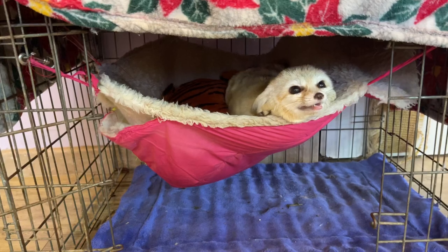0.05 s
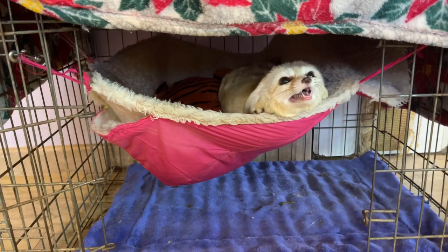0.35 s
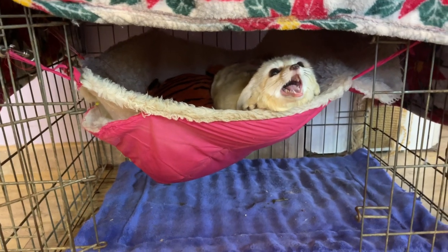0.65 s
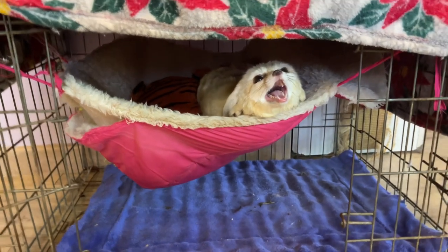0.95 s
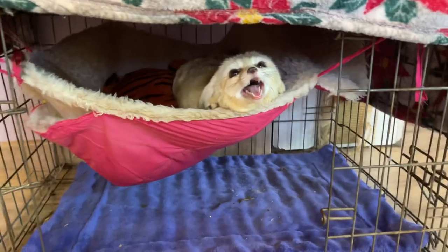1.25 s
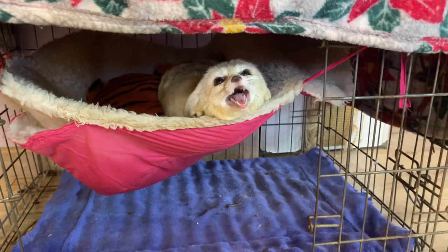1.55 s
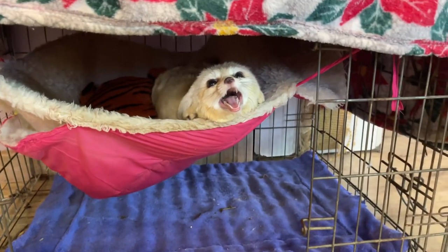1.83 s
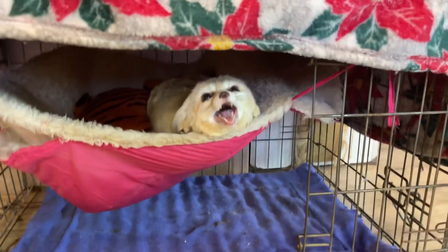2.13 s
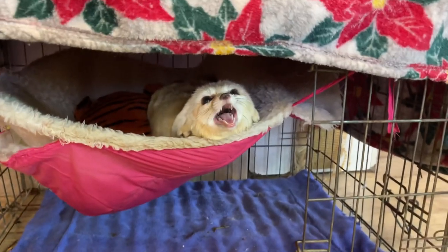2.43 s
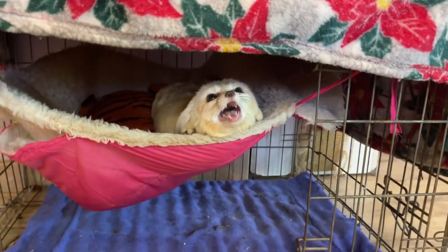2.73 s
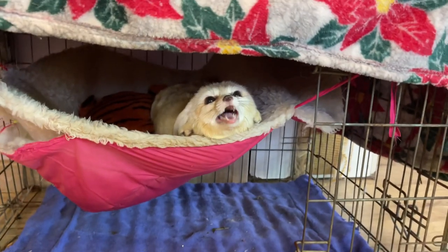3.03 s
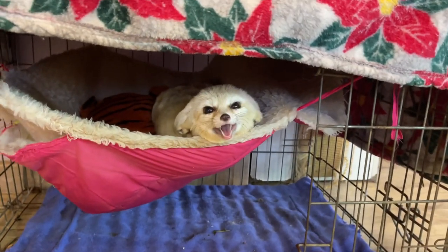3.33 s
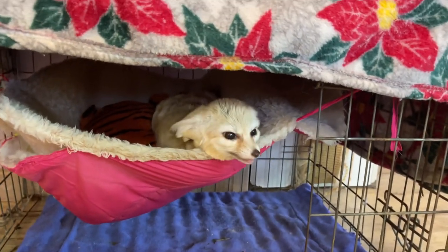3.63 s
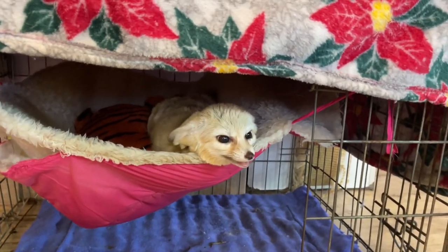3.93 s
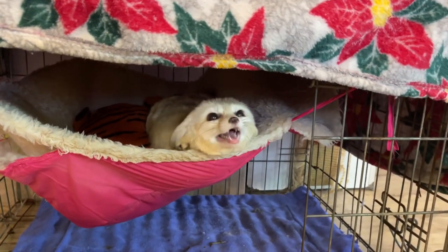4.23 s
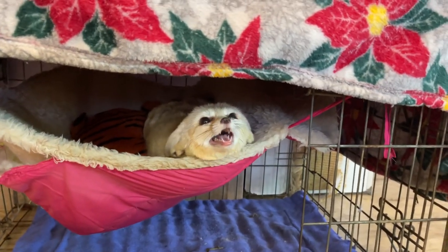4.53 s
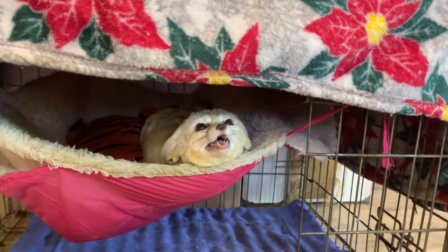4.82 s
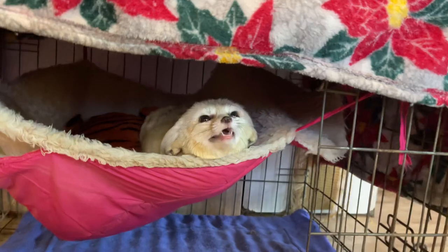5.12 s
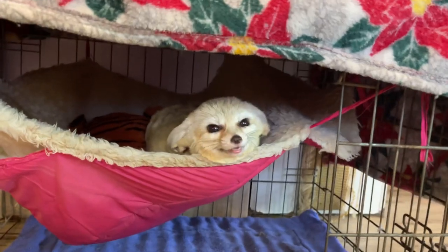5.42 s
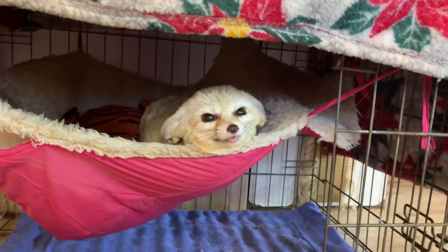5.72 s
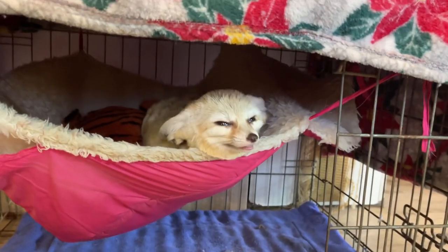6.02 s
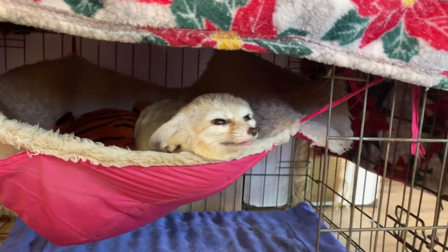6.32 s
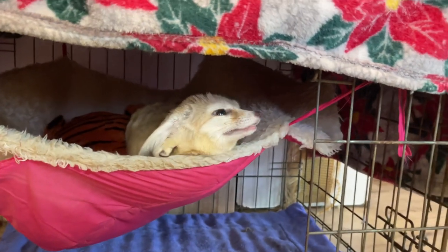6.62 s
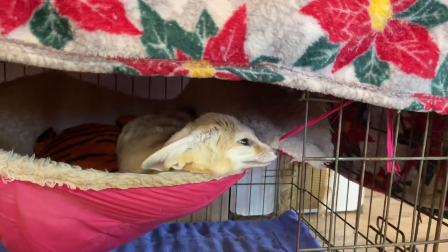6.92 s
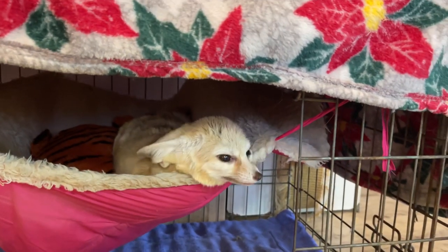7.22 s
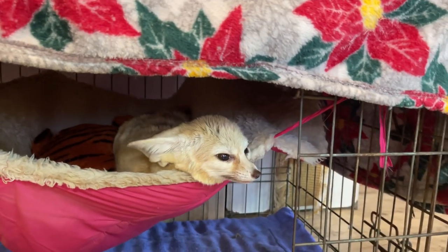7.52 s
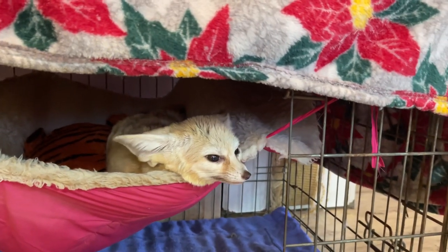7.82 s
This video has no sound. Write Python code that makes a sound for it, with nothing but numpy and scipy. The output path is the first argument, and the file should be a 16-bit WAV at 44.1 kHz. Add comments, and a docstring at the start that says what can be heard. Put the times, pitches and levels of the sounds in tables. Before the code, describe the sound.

Close, shrill, harsh yaps from a small fox repeat quickly, then slow and fade into whines, with faint dragging swishes further off.

```python
"""A fennec fox scolds from a hammock in a cloth-covered wire cage, in a small room with a mains hum.
Each call opens as a thin rising squeal of tight vocal folds, then breaks into a harsh yap, in which a
low and a high voice mix into sum and difference tones. The calls slow and end in a few hoarse whines.
Further off, something is dragged in swishes of stick-slip friction. Fleece rustles, faint bumps and
creaks are heard, and the cage and the room add their reflections."""
import sys
import numpy as np
from scipy import signal
from scipy.fft import rfft, irfft, next_fast_len
from scipy.io import wavfile
from scipy.ndimage import uniform_filter1d, map_coordinates

SR = 44100
rng = np.random.default_rng(int(sys.argv[2]) if len(sys.argv) > 2 else 0)


def put_to_file(sound):
    """Save the sound as 16-bit audio at rate SR, in the file named by the first command-line argument."""
    columns = np.atleast_2d(sound).T  # one column per channel
    safe = np.clip(columns, -1, 1)
    whole_steps = np.round(safe * 32767)
    wavfile.write(sys.argv[1], SR, whole_steps.astype(np.int16))


N = 355357
TIME = np.arange(N) / SR

# Spectra of noises and filters. Each row: frequency in Hz, relative level in dB.
ROOM_AIR_SPECTRUM = [(20, -38.5), (36, -29.5), (55, -8), (120, -13), (250, -13.5), (450, -24), (1200, -23),
                     (3500, -41), (6500, -33), (9500, -40), (12000, -73.5)]
REVERB_SPECTRUM = [(300, 0), (1000, 10), (2500, 10.5), (5000, -2), (9000, -5.5), (11000, -26)]
BUMP_SPECTRUM = [(120, -50.5), (230, -5), (340, -7.5), (550, -5.5), (800, -11.5), (2000, -55)]
FLEECE_SPECTRUM = [(2000, -6.5), (4000, -8.5), (7500, -0.5), (9500, -6.5), (12000, -17)]
DRAG_LOW_SPECTRUM = [(120, -69), (200, -62.5), (273, -8), (398, -12.5), (674, 0.5), (1090, -4), (1240, 4.5),
                     (1380, 3.5), (1600, -20.5), (1900, -9), (2470, -60.5), (4180, -120)]
DRAG_HISS_SPECTRUM = [(1060, -48), (1800, 3), (2170, -1.5), (2240, -3), (2670, 3.5), (3710, -0.5),
                      (5250, 6), (5690, -5), (9220, -14.5), (10100, -52.5), (12300, -49.5), (16000, -42),
                      (22000, -120)]
WHINE_AIR_SPECTRUM = [(350, -63.5), (600, -34), (919, -1), (1620, -2), (1830, -20.5), (2290, -11),
                      (6830, 3), (7450, -10), (9460, -12), (10100, -24), (12000, -21), (15600, -57),
                      (22000, -120)]
THROAT_AIR_SPECTRUM = [(600, -48.5), (1100, -19), (1800, -7), (2600, -18), (3400, 2.5), (4200, 2),
                       (5200, 6.5), (6400, 2.5), (8000, -9.5), (9400, -4.5), (12000, -26)]
MOUTH_AND_CAGE_SPECTRUM = [(480, -7.5), (740, -10), (1000, 0), (1500, 3.5), (2200, 5), (2900, 2.5),
                           (3650, 4), (4200, 4), (4800, 3.5), (5400, 5), (6300, 6), (7200, 4.5), (9200, 8),
                           (10000, 1), (11300, 0), (12500, -23)]

# Mains hum. Each row: harmonic number, relative level in dB.
HUM_HARMONICS = [(1, -75), (2, -61), (3, -68.5), (4, -75.5)]
# Reverberation time of the room. Each row: frequency in Hz, seconds to fall by 60 dB.
REVERB_TIMES = [(300, 0.45), (1000, 0.45), (3000, 0.41), (6000, 0.64), (12000, 0.56)]
# Soft bumps. Each row: time of the peak in seconds, length of each flank in seconds, level in dB.
SOFT_BUMPS = [(0.321, 0.18, -64.5), (3.12, 0.1, -59.5), (3.403, .21, -57.5), (6.676, 0.046, -66),
              (7.527, 0.066, -61.5), (7.993, .09, -60)]
# Creaks. Each row: start in seconds, length in seconds, first pitch in Hz, last pitch in Hz, level in dB.
FALLING_CREAKS = [(7.746, 0.043, 720, 506, -61), (7.837, 0.043, 560, 434, -59),
                  (7.84, 0.082, 960, 604, -73)]
# Resonances of the dragged thing. Each row: frequency in Hz, bandwidth in Hz, relative level in dB.
DRAG_RESONANCES = [(818, 16, -2.5), (1360, 75, -2), (2334, 12, 1.5), (2670, 300, -4.5), (3110, 390, -8),
                   (3460, 230, -12.5), (3970, 27, -4.5), (4280, 54, -1), (4910, 53, -10.5)]
# Swishes of the dragged thing. Each row: end of the attack in seconds, hold in seconds,
# relative levels of the low part and of the hiss in dB, hollow resonance in Hz.
DRAG_SWISHES = [(.94, 0.21, -39.5, -38.5, 1350), (3.14, 0.14, -53, -52, 1000),
                (3.37, 0.071, -46.5, -38.5, 1145), (6.64, 0.24, -41.5, -39, 1072),
                (6.82, 0.078, -37, -22.5, 1400), (7.0, 0.12, -48.5, -38.5, 1392),
                (7.99, .02, -56, -60, 1000)]
# Phase between the microphone's ports. Each row: frequency in Hz, lead of the left in radians.
LEFT_PHASE_LEAD = [(0, -1.5), (1460, 0.69), (3360, 1.5), (3880, 1.09), (5430, 4), (5860, 5.5), (6630, 8.5),
                   (7060, 6), (7840, 6.5), (8870, 8.5), (9730, 3), (10900, 2), (11600, 2.4), (12100, 13.5)]
# The microphone turns, then settles. Each row: time in seconds, extra lead of the right port in ms,
# level of right over left in dB.
MICROPHONE_AIM = [(.2, 0.048, 1.5), (.75, 0.048, 2.5), (1.25, 0.026, 3.4), (1.702, 0.0019, 1.5),
                  (3.6, 0.0021, 1), (6.5, 0, 0.5)]
# Whines. Each row: start in seconds, length in seconds, pitch in Hz, relative tone and air levels in dB.
HOARSE_WHINES = [(6.802, 0.078, 1406, -44, -26), (7.092, 0.094, 1905, -45.5, -39),
                 (7.563, 0.061, 1715, -55.5, -43.5)]
# Harmonics of the whine and the squeal. Each entry: relative level in dB, from the fundamental up.
WHINE_HARMONICS_DB = [8, -31, -20, 2.5]
SQUEAL_HARMONICS_DB = [-21.5, -4, -1.5, -7, -17, -20, -33]
# The squeal jumps from a weak lower register to a strong upper one.
# Each row: nominal time from the break in seconds, nominal pitch in Hz, relative level in dB.
SQUEAL_CONTOUR = [(-.04, 1330, -20), (-.03, 1400, -14), (-.022, 1440, -12), (-.019, 1560, -8),
                  (-.01, 1610, -3), (0, 1660, 1)]
# Tones of the yap. Each row: multiple of the high voice, multiple of the low voice, relative level in dB.
COMBINATION_TONES = [(0, 2, -18), (1, -1, -21.5), (1, 0, -9.5), (1, 1, -5.5), (1, 2, -0.5), (2, -1, -13),
                     (2, 0, -6), (1, 3, -7.5), (2, 1, -3.5), (2, 2, -9), (3, 0, -13.5), (3, 1, -13.5),
                     (3, 2, -16), (4, 1, -12)]
# Brightness as the mouth gapes and narrows. Each row: time in seconds, spectral tilt in dB.
GAPE_TILT = [(.2, -1), (.75, 0.75), (1.8, 0.52), (3.9, -0.74), (5.2, -0.44), (6.5, -1.5)]
# Calls. Each row: time of the break from squeal to yap in seconds, yap length in seconds, relative level
# in dB, squeal level against the yap in dB, low voice in Hz, high voice in Hz, roughness from 0 to 1.
CALLS = [ (.203, 0.045, -22, -6, 1085, 2664, 0.37), (0.458, 0.047, -18.5, -11, 1092, 2628, 0.72),
         (.726, 0.038, -19, -7, 1128, 2567, .75), (0.974, 0.038, -17.5, -11.5, 1173, 2667, 0.9),
         (1.239, .037, -19, -8.5, 1115, 2670, 0.69), (1.517, 0.04, -20, -1, 1120, 2554, 0.58),
         (1.783, 0.039, -20, -2, 1105, 2578, 0.63), (2.071, 0.041, -21, -5, 1019, 2568, 0.42),
         (2.345, 0.04, -22, 0, 1044, 2575, 0.57), (2.63, 0.045, -21.5, -9, 979.4, 2477, 0.47),
         (3.017, .051, -23.5, -6, 975.5, 2447, 0.47), (3.322, 0.041, -26.5, -8, 950, 2880, 1),
         (3.611, 0.05, -35, -3.5, 888, 2440, 0.84), (3.881, 0.043, -25.5, -6, 1025, 2620, 0.7),
         (4.185, 0.046, -20, -9.5, 990, 2562, 0.7), (4.463, 0.037, -21.5, -3, 972, 2454, 0.54),
         (4.783, 0.034, -24, -1, 841, 2710, 0.8), (5.142, .026, -23, -3.5, 850.5, 2848, 0.7),
         (5.47, 0.033, -25.5, -4, 748.6, 2860, 0.4), (5.879, 0.047, -25, -4, 731, 2938, 0.35),
         (6.198, 0.044, -28, -2.5, 778, 3043, 0.8), (6.491, 0.06, -24, -5.5, 977, 2644, .75)]

USUAL_LOW_HZ = 976.7   # the low voice at ordinary throat tension


def from_db(db):
    """Amplitude grows tenfold with every 20 dB."""
    return 10 ** (np.asarray(db) / 20)


def unit_rms(x):
    """Division by the root mean square gives a signal unit power."""
    return x / np.sqrt(np.mean(x ** 2) + 1e-20)


def at_hz(points, hz):
    """A table is interpolated along a logarithmic frequency axis."""
    frequencies, values = np.transpose(points)
    return np.interp(np.log(np.maximum(hz, 1)), np.log(frequencies), values)


def coloured(x, spectrum):
    """A linear filter multiplies each frequency by its own gain."""
    size = next_fast_len(x.shape[-1] + 2048)
    gain = from_db(at_hz(spectrum, np.fft.rfftfreq(size, 1 / SR)))
    return irfft(rfft(x, size) * gain, size)[..., :x.shape[-1]]


def noise(spectrum, shape):
    """White noise takes on the spectrum of its filter."""
    return unit_rms(coloured(rng.standard_normal(shape), spectrum))


def wobble(rate_hz, size):
    """Low-passed noise gives a smooth random fluctuation of unit power."""
    lowpass = signal.butter(2, rate_hz, fs=SR, output="sos")
    return unit_rms(signal.sosfilt(lowpass, rng.standard_normal(2 * size))[size:])


def phase_of(hz):
    """Phase is the time integral of frequency."""
    return 2 * np.pi * np.cumsum(hz) / SR


def swell(times, db):
    """An envelope runs straight in dB between its points and is silent outside them."""
    return from_db(np.interp(TIME, times, db, left=-np.inf, right=-np.inf))


def decay(start, db, db_per_s, open_s=1.0):
    """Exponential decay follows a sudden onset; a gate stays open for open_s, then closes as slowly."""
    gate = np.interp(TIME, [start - .002, start, start + open_s, start + 2 * open_s], [0, 1, 1, 0])
    return gate * from_db(db - db_per_s * np.maximum(TIME - start, 0))


def background(mains_hz=50, rise_db_per_s=0.68):
    """Harmonics of the mains, stronger on the left, swell slowly along with the room's broadband air."""
    hum = 0
    for k, db in HUM_HARMONICS:
        phase = 2 * np.pi * k * mains_hz * TIME + rng.uniform(0, 2 * np.pi)
        hum += np.sqrt(2) * from_db(db) * np.sin(phase)
    shared_air = from_db(-72) * noise(ROOM_AIR_SPECTRUM, N)
    diffuse_air = from_db(-67.5) * noise(ROOM_AIR_SPECTRUM, (2, N))
    return from_db(-2.5 + rise_db_per_s * TIME) * (hum * from_db([[2.2], [-3]]) + shared_air + diffuse_air)


def reflections(x, room_db, cage_db=-10, cage_t60_s=0.062, gap_s=0.015):
    """Convolution adds the cage's early reflections and a room tail with a decay rate for each band."""
    t = TIME[:SR * 3 // 4]
    tail, edges = 0, np.geomspace(150, 15000, 9)
    for low, high in zip(edges, edges[1:]):
        bandpass = signal.butter(2, [low, high], "band", fs=SR, output="sos")
        band = signal.sosfilt(bandpass, rng.standard_normal((2, len(t))))
        tail += band * from_db(-60 * t / at_hz(REVERB_TIMES, np.sqrt(low * high)))
    tail = coloured(tail, REVERB_SPECTRUM) * (t > gap_s)
    cage = rng.standard_normal((2, len(t))) * from_db(-60 * t / cage_t60_s) * (t > .001)
    response = (from_db(cage_db) * unit_rms(cage) + from_db(room_db) * unit_rms(tail)) / np.sqrt(len(t))
    return signal.fftconvolve(np.atleast_2d(x), response, axes=1)[:, :N]


def room_ring(hz=1050):
    """The reverberation of an earlier call dies away exponentially."""
    tone = from_db(-10) * wobble(11, N) * np.sin(2 * np.pi * hz * TIME)
    air = coloured(noise(THROAT_AIR_SPECTRUM, (2, N)), REVERB_SPECTRUM)
    return decay(start=.036, db=-43, db_per_s=112.5) * (air + tone)


def bumps():
    """Brief swells of low-frequency noise are heard as dull bumps."""
    envelope = sum(swell([peak - flank, peak, peak + flank], [db - 10.5, db, db - 13])
                   for peak, flank, db in SOFT_BUMPS)
    return envelope * noise(BUMP_SPECTRUM, N)


def creaks(jitter=0.038):
    """Falling tones with random frequency modulation are heard as tiny creaks."""
    out = np.zeros(N)
    for start, length, first_hz, last_hz, db in FALLING_CREAKS:
        pitch = np.interp(TIME, [start, start + length], [first_hz, last_hz])
        phase = phase_of(pitch * (1 + jitter * wobble(221, N)))
        out += swell([start, start + length / 3, start + length], [db - 30, db, db - 6]) * np.sin(phase)
    return out


def fleece_rustle(grain_db=3):
    """Friction gives a grainy hiss as fleece shifts under the fox."""
    envelope = decay(start=7.348, db=-51, db_per_s=48, open_s=0.16)
    return envelope * noise(FLEECE_SPECTRUM, (2, N)) * from_db(grain_db * wobble(230, N))


def stick_slip(rate_hz=55, depth_db=3):
    """Alternate sticking and slipping modulates the amplitude of a resonance."""
    return from_db(depth_db * wobble(rate_hz, N))


def resonances(modes):
    """Under broadband excitation each mode rings in a band about its natural frequency."""
    white = rng.standard_normal((2, N))
    return unit_rms(sum(from_db(db) * signal.lfilter(*signal.iirpeak(hz, hz / width, fs=SR), white)
                        for hz, width, db in modes))


def swish(start, attack, hold, db, release_db_per_s):
    """The envelope of one swish grows exponentially, holds and decays exponentially."""
    attack_db = -10 * np.clip((start - TIME) / attack, 0, 10)
    release_db = -release_db_per_s * np.clip(TIME - start - hold, 0, 1)
    return from_db(db + attack_db + release_db)


def dragging(attack_s=0.0625, rise_hz=166.6, hollow_spread_hz=90):
    """Sliding friction excites a dragged thing's resonances, uncorrelated at the two ears."""
    low_gain, hiss_gain, glide = 0, 0, []
    for start, hold, low_db, hiss_db, hz in DRAG_SWISHES:
        low_gain = np.maximum(low_gain, swish(start, attack_s, hold, low_db, release_db_per_s=136.5))
        hiss_gain = np.maximum(hiss_gain, swish(start, attack_s, hold, hiss_db, release_db_per_s=143.5))
        glide += [(start - attack_s, hz - rise_hz), (start + .07, hz)]   # climbs as the swish gains speed
    carrier = np.exp(1j * phase_of(np.interp(TIME, *np.transpose(glide))))
    sidebands = np.array([wobble(hollow_spread_hz, N) + 1j * wobble(hollow_spread_hz, N) for _ in range(2)])
    hollow = np.real(carrier * sidebands)
    low = noise(DRAG_LOW_SPECTRUM, (2, N)) + from_db(-3) * hollow * stick_slip()
    hiss = from_db(-2.5) * noise(DRAG_HISS_SPECTRUM, (2, N))
    hiss += from_db(-0.5) * resonances(DRAG_RESONANCES) * stick_slip()
    grain = from_db(-7.5 - wobble(90, N))
    return grain * (low_gain * low + hiss_gain * hiss)


def at_ports(x):
    """A wave meets the two ports with differences of phase and level that shift as the microphone turns."""
    size = next_fast_len(N + 2048)
    lead = np.interp(np.fft.rfftfreq(size, 1 / SR), *np.transpose(LEFT_PHASE_LEAD))
    right = irfft(rfft(x, size) * np.exp(-1j * lead), size)[:N]
    times, early_ms, pan_db = np.transpose(MICROPHONE_AIM)
    early_samples = np.interp(TIME, times, early_ms) * SR / 1000
    right = map_coordinates(right, [np.arange(N) + early_samples], order=3)
    return np.array([x, right]) * from_db(np.interp(TIME, times, pan_db) / 2 * np.array([[-1], [1]]))


def whines(jitter=0.055, edge_s=0.038):
    """Pitch jitter and breath noise make weak harmonic tones hoarse."""
    out, air = np.zeros(N), noise(WHINE_AIR_SPECTRUM, N)
    for start, length, hz, tone_db, air_db in HOARSE_WHINES:
        end = start + length
        gate = np.interp(TIME, [start - edge_s, start + edge_s, end - edge_s, end], [0, 1, 1, 0])
        phase = phase_of(hz * (1 + jitter * wobble(500, N)))
        tone = np.sqrt(2) * sum(from_db(db) * np.sin(k * phase) for k, db in enumerate(WHINE_HARMONICS_DB, 1))
        out += gate * (from_db(tone_db) * tone + from_db(air_db) * air)
    return out


def squeal(t, tension, usual_length_s=0.028, release_db_per_s=1800, opening_s=0.016):
    """Tight vocal folds vibrate in a thin, rising harmonic tone that dies at the break (t = 0)."""
    size = len(t)
    length = usual_length_s * tension ** -1.7   # a slack throat squeals longer and a little flatter
    tuning = tension ** .04 * (1 + .015 * rng.standard_normal())
    times, hz, db = np.transpose(SQUEAL_CONTOUR)
    times = times * np.exp(0.11 * rng.standard_normal())   # the register jump comes early or late
    jitter = 1 + 0.0073 * wobble(450, size) + .012 * wobble(50, size)
    phase = phase_of(tuning * np.interp(t, times, hz) * jitter)
    tone = sum(from_db(level + 3 * wobble(40, size)) * np.sin(k * phase)
               for k, level in enumerate(SQUEAL_HARMONICS_DB, 1))
    opening = np.clip((t + length) / opening_s, 0, 1)
    catch_db = 1.5 * wobble(160, size)
    gain = opening * from_db(np.interp(t, times, db) + catch_db - release_db_per_s * np.maximum(t, 0))
    airiness = from_db(np.interp(t, [-length, -length / 2], [3, -11]))   # airy until the folds lock
    lip_tick = from_db(-16) * np.exp(-np.abs(t + length) / 0.0005) * (t > -length)   # the lips part
    return gain * unit_rms(tone) + (gain * airiness + lip_tick) * noise(THROAT_AIR_SPECTRUM, size)


def two_voices(low_pitch, high_pitch, chaos, progress, tension, bite_from_hz=4640, bite_to_hz=3500):
    """Two coupled voices make sum and difference tones; a piercing mouth resonance falls through them."""
    size = len(chaos)
    waver = 1 + 0.0123 * wobble(60, size)
    low_phase = phase_of(low_pitch * waver * (1 + 0.024 * chaos * wobble(390, size)))
    high_phase = phase_of(high_pitch * waver * (1 + 0.029 * chaos * wobble(600, size)))
    bite_hz = (bite_from_hz + (bite_to_hz - bite_from_hz) * progress) * (1 + .06 * rng.standard_normal())
    bite_db = 3 * tension ** 3.5   # a slack throat bites less
    voice = 0
    for m, n, db in COMBINATION_TONES:
        detuning = (m * high_pitch + n * low_pitch - bite_hz) / 500   # in half-widths of the resonance
        flicker_db = 6 * chaos * wobble(110, size)
        drift_db = 3.14 * wobble(17, size)   # the mouth moves
        gain = from_db(db + bite_db / (1 + detuning ** 2) + flicker_db + drift_db)
        voice += gain * np.sin(m * high_phase + n * low_phase + rng.uniform(0, 2 * np.pi))
    return unit_rms(voice), low_phase


def yap(t, length, closing_db, low_hz, high_hz, rough, tilt_db,
        start_low_hz=1010, start_high_hz=3020, dip_hz=25.18, settle_s=.026, shut_s=0.028):
    """Biphonation: two voices, chaotic at the break, settle; the low one lingers as the mouth shuts."""
    size = len(t)
    progress = np.clip(t / length, 0, 1)
    unsettled = np.clip(1 - t / settle_s, 0, 1)
    closing = np.clip((t - length) / shut_s, 0, 1)
    shut_at = length + shut_s
    chaos = np.clip(rough * (1 - .35 * progress) + .35 * unsettled, 0, 1.1)
    low_pitch = low_hz + (start_low_hz - low_hz) * np.maximum(unsettled ** 2, .85 * closing ** 2)
    low_pitch += dip_hz * (2 / np.pi - np.sin(np.pi * np.clip(t / shut_at, 0, 1)))
    high_pitch = high_hz + (start_high_hz - high_hz) * unsettled - 60 * closing
    voice, low_phase = two_voices(low_pitch, high_pitch, chaos, progress, low_hz / USUAL_LOW_HZ)
    voice += from_db(-21.5) * unsettled * np.sin(2 * low_phase)   # a bright octave just after the break
    air = noise(THROAT_AIR_SPECTRUM, size) * (1 + 0.65 * np.cos(low_phase))   # one puff each cycle
    voice += .75 * chaos * air
    # negative tilt gives a nasal bite, positive tilt a bright edge
    harsh = coloured(voice, [(2000, -tilt_db), (3900, -2 * tilt_db), (6300, tilt_db), (12000, 2 * tilt_db)])
    harsh /= np.sqrt(uniform_filter1d(harsh ** 2, size=300) + 1e-9)   # steady pressure evens the power
    release_db = -520 * np.maximum(t - length, 0)
    harsh *= from_db(-1.36 * progress + release_db + 1.2 * wobble(73, size))
    tone_db = np.interp(t, [0, .018, length, shut_at, shut_at + 0.0016], [-12, -5.5, -2, -5.5, -42],
                        right=-np.inf)
    tone_db += 3 * (closing - .5)   # the closing mouth favours the low voice
    closing_tone = np.sqrt(2) * np.sin(low_phase)
    closing_tone *= from_db(closing_db + tone_db + 7.2 * chaos * wobble(130, size))
    attack = np.clip((t + 0.0044) / 0.0087, 0, 1)
    return attack * (harsh + closing_tone)


def fox_calls(usual_yap_db=-20):
    """Source and filter: each squeal breaks into a yap, and the mouth and cage colour both."""
    out = np.zeros(N)
    before, after = SR // 12, SR // 6
    t = np.arange(-before, after) / SR
    for break_s, length, db, squeal_db, low_hz, high_hz, rough in CALLS:
        lead_in = from_db(squeal_db) * squeal(t, tension=low_hz / USUAL_LOW_HZ)
        closing_db = -37.5 + 0.088 * (db - usual_yap_db)   # hardly follows the force of the yap
        tilt_db = np.interp(break_s, *np.transpose(GAPE_TILT))
        body = yap(t, length, closing_db - db, low_hz, high_hz, rough, tilt_db)
        at = round(break_s * SR)
        out[at - before:at + after] += from_db(db) * (lead_in + body)
    return coloured(out, MOUTH_AND_CAGE_SPECTRUM)


def scene():
    """The ratio of direct to reflected sound sets the fox close by and the dragging deeper in the room."""
    voice = fox_calls() + whines()
    noises = dragging() + (bumps() + creaks())
    near = at_ports(voice) + reflections(voice, room_db=-16)
    far = noises + reflections(noises, room_db=-2)
    return near + far + fleece_rustle() + room_ring() + background()


def record(dry, ceiling=.85, cutoff_hz=12500):
    """Soft saturation rounds the highest peaks, and a steep low-pass filter cuts the top."""
    rounded = dry / (1 + (dry / ceiling) ** 6) ** (1 / 6)
    return signal.sosfilt(signal.ellip(10, .3, 80, cutoff_hz, fs=SR, output="sos"), rounded)


dry = scene()
out = record(dry)
put_to_file(out)
```